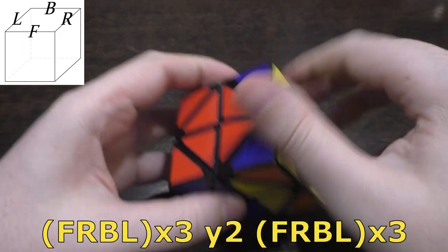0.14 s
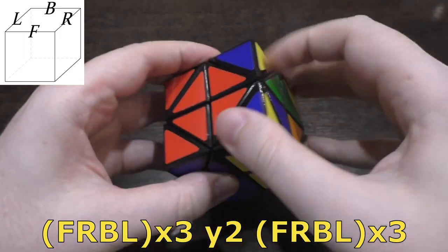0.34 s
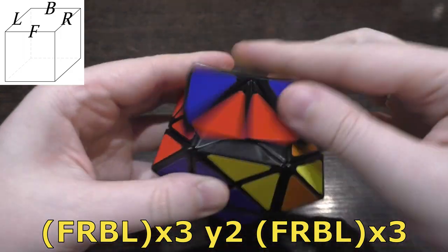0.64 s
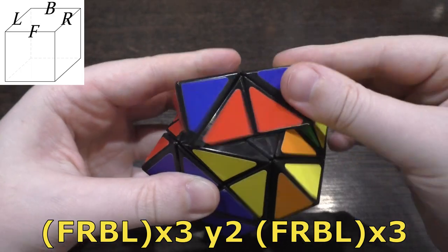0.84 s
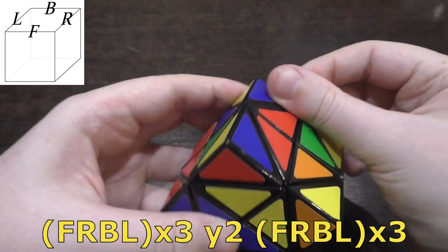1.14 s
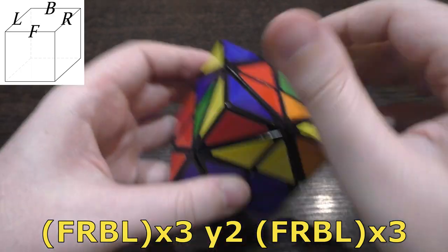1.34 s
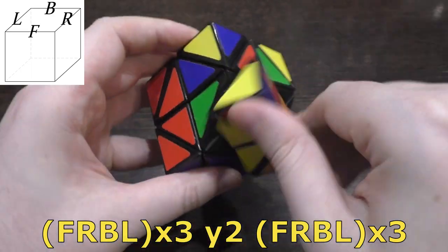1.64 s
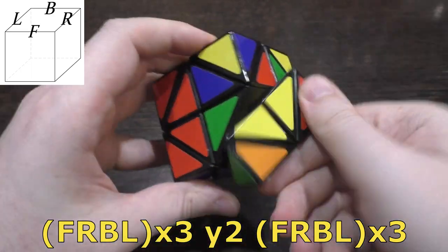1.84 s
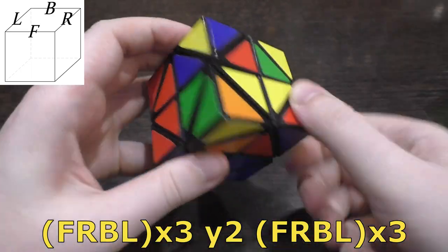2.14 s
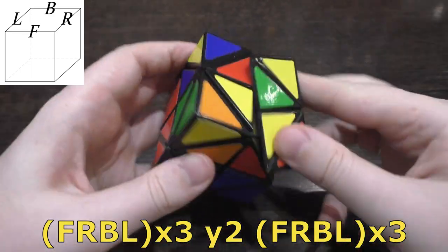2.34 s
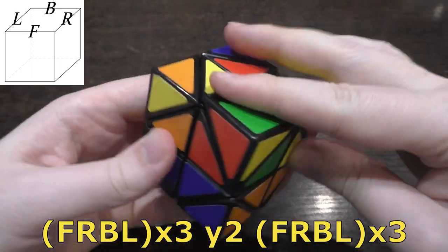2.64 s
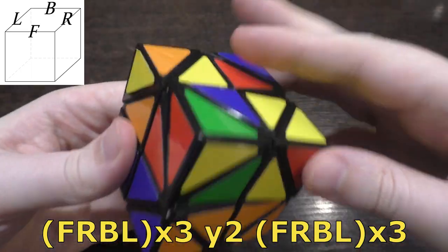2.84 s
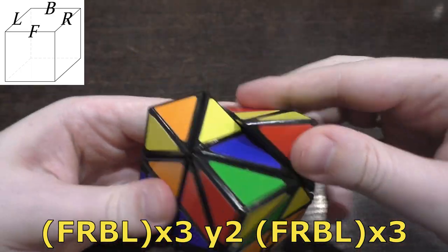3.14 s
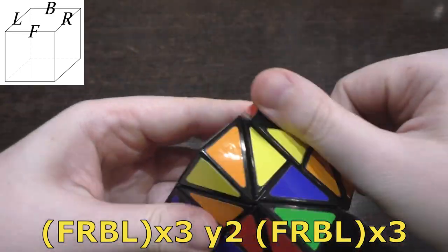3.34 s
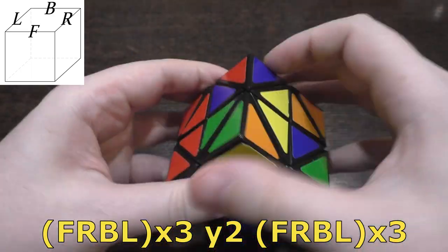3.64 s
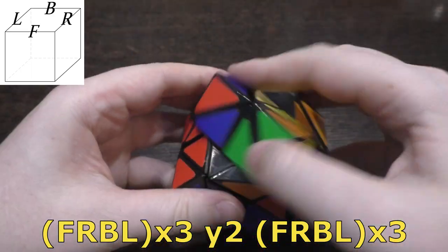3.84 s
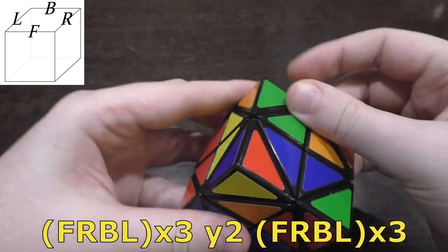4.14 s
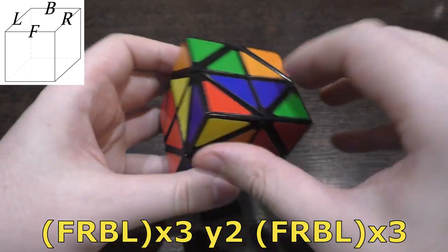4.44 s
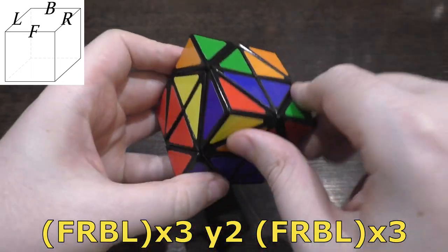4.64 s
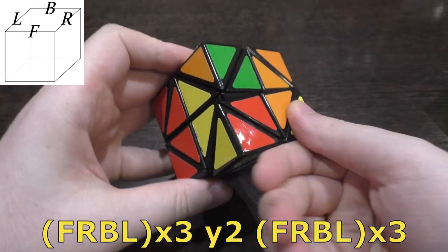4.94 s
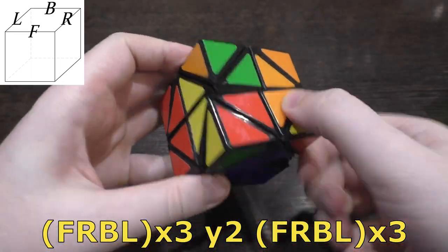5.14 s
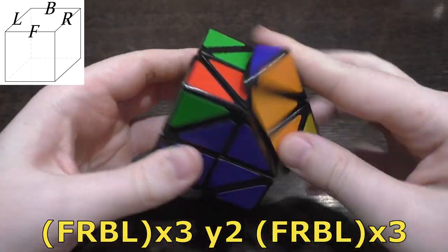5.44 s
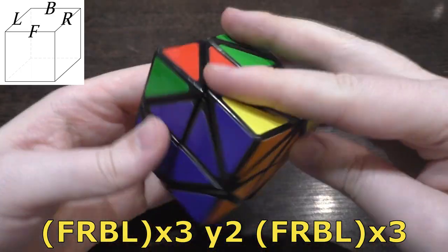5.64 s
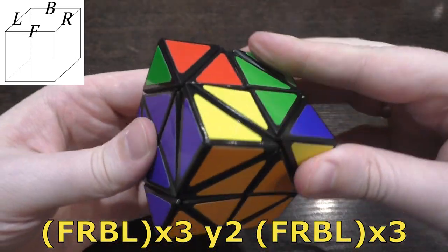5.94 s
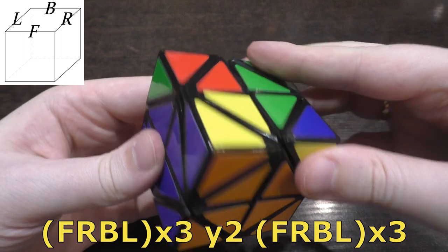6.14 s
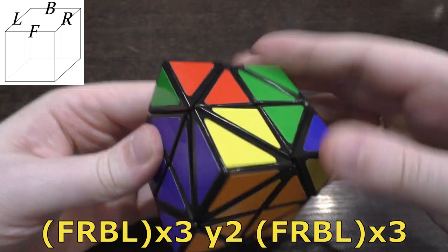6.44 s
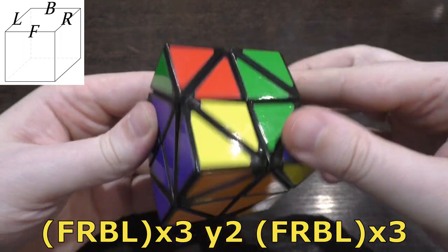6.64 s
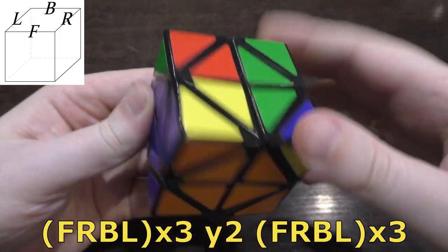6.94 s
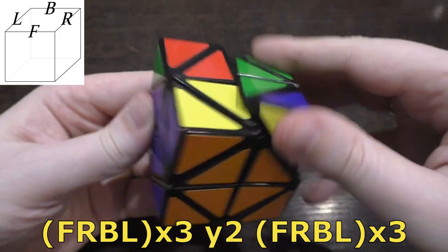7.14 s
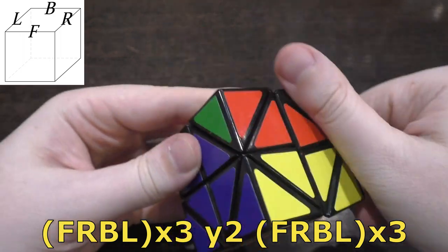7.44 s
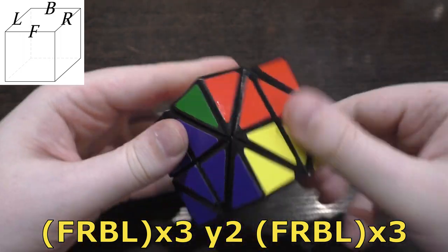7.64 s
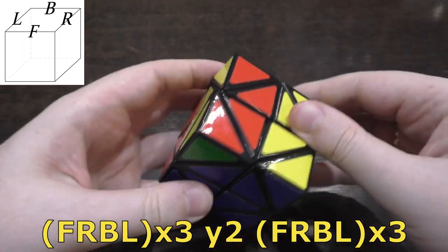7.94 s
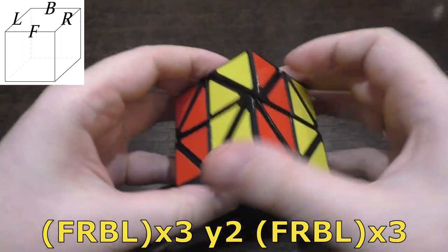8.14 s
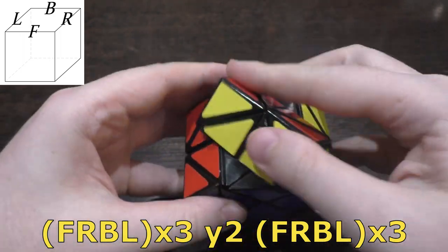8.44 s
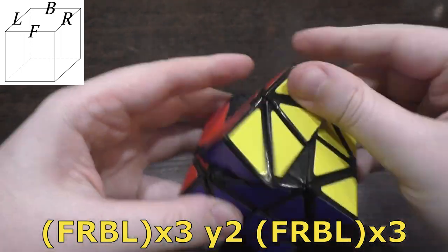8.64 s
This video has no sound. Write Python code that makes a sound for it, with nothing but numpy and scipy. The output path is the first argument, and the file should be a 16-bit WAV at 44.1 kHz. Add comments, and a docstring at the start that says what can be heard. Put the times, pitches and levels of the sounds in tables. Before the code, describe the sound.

A plastic twisty puzzle is turned by two hands close to the microphone in a small room. Dry, hollow clacks come in dense irregular clusters, joined by short gritty scrapes, a faint metallic spring ringing and a few tiny squeaks. Soft hand rustles fill some grip changes. Faint hiss and hum lie beneath, dropping slightly after three seconds. Toward the end the clacks thin out and a last long scrape follows.

```python
"""Twisty puzzle in two hands

Two hands turn the layers of a plastic puzzle in quick runs, close to a microphone in a small room.
Clacks are bursts of tiny contacts coloured by hollow plastic; scraping and settling are showers of ticks.
Springs in the core sing with the turns; short squeaks and pings are dying sines. Grip changes are shaped noise.
Noise also makes the early echoes, the room tail and a faint hiss, which lies under everything with a hum."""
import sys
import numpy as np
from scipy import signal
from scipy.fft import rfft, irfft
from scipy.io import wavfile
from scipy.ndimage import uniform_filter1d

SR = 44100
rng = np.random.default_rng(int(sys.argv[2]) if len(sys.argv) > 2 else 0)


def unload_wav(signal):
    """Save mono or channel-first audio to the path in sys.argv[1] as 16-bit WAV at rate SR, clipped to [-1, 1]."""
    wavfile.write(
        sys.argv[1],
        SR,
        np.round(np.clip(np.atleast_2d(signal).T, -1, 1) * 32767).astype(np.int16),
    )


N = 388080
SIZE = 2048  # samples in one short burst
HZ = np.fft.rfftfreq(SIZE, 1 / SR)
TIME = np.arange(N) / SR

# clacks of the pieces: time_s (near the first touch), level_db (reference for the parts of the clack),
# hardness_db (treble relative to that level)
CLACK_ROWS = [(0.1996, -13, -12.5), (0.395, -22.5, -10.5), (0.4504, -22, -22), (0.5315, -9, -8),
              (0.5515, -15, 0), (0.557, -11, -3.5), (0.5666, -4, -8.5), (0.6597, -21.5, -11),
              (0.6727, -26, -7.5), (0.752, -7, -15.5), (0.793, -15.5, -15), (0.8347, -17.5, -11.5),
              (0.8903, -11.5, -10), (0.9, -15, -8), (0.9546, -19, -8), (1.0705, -13, -13),
              (1.1621, -18, -12.5), (1.1723, -16, -11), (1.1823, -13, -9), (1.3383, -8.5, -8),
              (1.3865, -15.5, -16.5), (1.443, -32.5, 0), (1.6028, -31, -24), (1.6538, -15.5, -15),
              (1.6721, -17.5, -10.5), (1.703, -11, -13.5), (1.7235, -8.5, -11.5), (1.8436, -3.5, -9),
              (1.938, -13.5, -9.5), (2.0392, -13, -12), (2.056, -14.5, -7.5), (2.154, -12.5, -10.5),
              (2.244, -22.5, -13.5), (2.2662, -17, -10.5), (2.3763, -10.5, -4), (2.4171, -12, -7.5),
              (2.4306, -10.5, -1.5), (2.5335, -13.5, -8), (2.6117, -15, -14), (2.6486, -13.5, -24),
              (2.7135, -19.5, -17), (2.7612, -12, -1), (2.9602, -20.5, -24.5), (2.9916, -13.5, -12),
              (3.032, -24.5, -6.5), (3.057, -7.5, -13), (3.0973, -10.5, -3), (3.1675, -5.5, -4.5),
              (3.1834, -21.5, 4.5), (3.4313, -21, -11), (3.5359, -22.5, -14), (3.5914, -26, -21),
              (3.863, -17, -8.5), (3.898, -15.5, -9), (4.0884, -14.5, -6), (4.2116, -12.5, -5.5),
              (4.3485, -15.5, -14.5), (4.4061, -21, -17), (4.4788, -15.5, -13), (4.599, -29, -26),
              (4.6768, -17, -14), (4.695, -17.5, -10.5), (4.7277, -15.5, -13), (4.79, -7.5, -4),
              (4.802, -17, -7.5), (4.9847, -15.5, -18), (5.0292, -20.5, -10), (5.1136, -15.5, -16),
              (5.1584, -16, -8.5), (5.217, -16.5, -10), (5.2965, -26.5, -16), (5.4106, -15.5, -7.5),
              (5.4362, -22, -4.5), (5.4713, -9, -4), (5.5578, -11.5, -9), (5.665, -21, -5),
              (5.7479, -26, -18), (5.7733, -18.5, -17.5), (5.9493, -23, -13.5), (5.9555, -10.5, -9.5),
              (5.998, -10.5, -15), (6.0349, -12.5, -11.5), (6.054, -14, -2), (6.0604, -8.5, -3.5),
              (6.1308, -14.5, -10), (6.1678, -10.5, -13), (6.246, -20, -8), (6.2548, -16.5, -11.5),
              (6.2734, -16, -9.5), (6.3148, -8.5, -9), (6.3305, -19.5, -6.5), (6.4943, -26.5, -12.5),
              (6.69, -13, -20), (6.7218, -9, -8), (6.7606, -13.5, -10.5), (6.7913, -16, -14.5),
              (6.8094, -15.5, -11.5), (6.8566, -12.5, -5), (6.894, -18, -8.5), (6.9728, -22, -4.5),
              (6.99, -7, -8), (7.0335, -14, -5.5), (7.0501, -8, -6), (7.1743, -11.5, -8.5),
              (7.1971, -12.5, -10), (7.231, -14, -14.5), (7.3825, -8.5, -13.5), (7.5507, -20.5, -15),
              (7.714, -32.5, -15), (7.7684, -17, -12), (7.9196, -10, -9.5), (8.0568, -16, -11),
              (8.4052, -9, -8), (8.4499, -16.5, 4.5), (8.5016, -18.5, -6)]


def amp(db):
    """Turns decibels into a gain."""
    return 10 ** (np.asarray(db) / 20)


def evened(x):
    """Scales a sound to an rms (average strength) of 1."""
    return x / np.sqrt(np.mean(x ** 2) + 1e-20)


def read(points, hz):
    """Reads a curve between its points on a log-frequency axis."""
    point_hz, value = np.transpose(points)
    return np.interp(np.log(hz + 1), np.log(point_hz), value)


def add(mix, start_s, sound):
    """Mixes a sound in from the given time."""
    part = mix[max(round(start_s * SR), 0):][:len(sound)]
    part += sound[:len(part)]


def wobble(size, span):
    """Makes a smooth random curve of rms 1 that changes over about span steps."""
    noise = rng.standard_normal(size)
    smoother = signal.windows.hann(2 * int(span) + 1)
    return evened(signal.fftconvolve(noise, smoother, "same"))


def ring(colour_db):
    """Turns a colour into the ringing after one sharp tap: nothing sounds before the tap."""
    both_halves_db = np.r_[colour_db, colour_db[-2:0:-1]]
    log_gain = np.log(amp(both_halves_db))
    return np.fft.ifft(np.exp(np.conj(signal.hilbert(log_gain)))).real


def ripple(fine_db=2, broad_db=2, fine_hz=260, broad_hz=1200):
    """Gives a piece its own random resonances, both fine and broad."""
    fine = fine_db * wobble(len(HZ), fine_hz / HZ[1])
    broad = broad_db * wobble(len(HZ), broad_hz / HZ[1])
    return fine + broad


def piece():
    """Colours one hollow plastic piece: a shared colour plus resonances of its own."""
    # shared colour of the hollow pieces: pitch_hz, level_db
    shell_curve = [(40, -32), (200, -20), (480, -21), (710, -11.5), (870, -16), (1080, 2), (1280, -4.5),
                   (1850, 1), (2700, -7.5), (7000, -15), (9900, -12.5), (15500, -21)]
    return read(shell_curve, HZ) + ripple()


def mode(hz, t60_s, rise_s=0.00087):
    """Vibrates as one sine that falls by 60 dB in t60_s after a very short rise."""
    t = TIME[:SR]
    fall = np.exp(-np.log(1000) * t / t60_s)
    return np.sin(2 * np.pi * hz * t) * fall * np.minimum(t / rise_s, 1)


def clack(time_s, level_db, hardness_db, contacts_per_s=9000, trail=1.0, firmness=1.56, lead=.55, swell=1.41):
    """Lets loose pieces touch, hit home and rattle out within a few milliseconds."""
    # a dull tap chatters a little, a loose piece most, and a hard snap is over at once:
    # hardness_db, chatter_ms
    chatter_curve = [(-13.5, 2.1), (-8.5, 3), (-1.5, 1.25)]
    # limits of the knock, body and treble bands: edge_hz
    band_edges = [400, 1300, 4500, 16000]
    # a harder blow also knocks the core more; both levels are relative to the clack's level
    body_db, knock_db, knock_db_per_hard_db = -5, -9, 0.47

    chatter_ms = max(np.interp(hardness_db, *np.transpose(chatter_curve)), .5)
    home = SIZE // 8  # sample where the main blow lands
    ms = (np.arange(SIZE) - home) * 1000 / SR
    contacts = rng.standard_normal(SIZE) * (rng.random(SIZE) < contacts_per_s / SR)
    # the contacts swell from the first touch, then die away after the blow
    contacts *= np.exp(-abs(ms) / trail / chatter_ms)
    contacts *= np.clip(2 * ms / (swell * chatter_ms) + 2, 0, 1)

    # a short clack is mostly one clean blow, a long one mostly chatter
    blow_share = .7 / max(chatter_ms, 1) ** abs(firmness)
    force = np.sqrt((1 - blow_share) / SIZE) * evened(contacts)
    force[home] += np.sqrt(blow_share)

    # the blow sets the strength of knock, body and treble, each as rms over 2 ms
    colour_db = piece()
    wanted_db = level_db + np.array([knock_db + knock_db_per_hard_db * hardness_db, body_db, hardness_db])
    for _ in range(3):  # each pass brings the bands nearer to the wanted strengths
        power = abs(rfft(force) * amp(colour_db)) ** 2 * 2 / SIZE / (SR / 500)
        band_power = np.histogram(HZ, band_edges, weights=power)[0]
        tilt_db = wanted_db - 10 * np.log10(band_power)
        tilt_points = list(zip([500, 1100, 1700, 7000], [tilt_db[:2].mean(), *tilt_db]))
        colour_db = colour_db + read(tilt_points, HZ)
    start_s = time_s + lead * chatter_ms / 1000 - home / SR  # the blow lands just after time_s
    return start_s, signal.fftconvolve(force, ring(colour_db))


def clacks():
    """Adds up all the clacks of pieces hitting home."""
    out = np.zeros(N)
    for row in CLACK_ROWS:
        add(out, *clack(*row))
    return out


def rub(size, catches_per_s=1200, size_db=3.5, snags_per_s=28, snag_s=0.0025, snag_size=8,
        shift_db=3, shift_s=0.032, count=4):
    """Makes sliding faces catch in tiny ticks, heavier after each snag; load shifts from piece to piece."""
    # how rubbing differs from the colour of a piece: pitch_hz, change_db
    rub_curve = [(700, 2), (1100, -1), (3500, 1), (9000, 0.5), (14000, -1.5)]
    out = np.zeros(size)
    for _ in range(count):  # one round for each rubbing piece
        snags = (rng.random(size) < snags_per_s / SR) * 1.0
        load = 1 + snag_size * signal.lfilter([1], [1, -np.exp(-1 / (snag_s * SR))], snags)
        ticks = rng.choice([-1, 1], size) * (rng.random(size) < catches_per_s / SR)
        uneven_db = size_db * rng.standard_normal(size) + shift_db * wobble(size, shift_s * SR)
        ticks = ticks * load * amp(uneven_db)
        out += signal.oaconvolve(ticks, ring(piece() + read(rub_curve, HZ)))[:size]
    return evened(out)


def settling(start_db=-23.5, fall_db_per_s=-220):
    """Lets each piece that has hit home rub on for a moment, quickly fading."""
    out = np.zeros(N)
    t = TIME[:SR // 8]
    for time_s, level_db, _ in CLACK_ROWS:
        grain = rub(len(t), catches_per_s=2500, size_db=3.5, snag_size=1.1, count=1)
        add(out, time_s, amp(level_db + start_db + fall_db_per_s * t) * grain)
    return out


def spring(shake, t60_s=0.22, level_db=-54):
    """Makes the spring of the turning axle sing along with the sliding; each has its own tension."""
    # ways a spring vibrates, before its own random changes: pitch_hz, level_db
    spring_modes = [(1760, -1), (1940, 5.5), (3400, 3), (5250, -2), (6550, 6)]
    # random change of each mode: share of its pitch, and dB
    changes = rng.standard_normal((len(spring_modes), 2)) * [.015, 2.5]
    modes = np.zeros(SR)
    for (hz, db), (detune, off_db) in zip(spring_modes, changes):
        modes += amp(db + off_db) * mode(hz * (1 + detune), t60_s)
    return amp(level_db) * signal.fftconvolve(shake, modes)


def scraping(attack_s=0.0098, release_s=0.0377):
    """Rubs the faces together in each turn, which gets going, holds and runs out, and stirs a spring."""
    # turns of a layer: start_s, end_s (where the fade begins), level_db, sing_db (how freely its spring sings)
    slide_rows = [(0, 0.057, -31.5, -1), (0.638, 0.77, -30.5, 0), (0.941, 1.055, -30.5, 6),
                  (1.691, 1.865, -33, 0), (1.948, 2.037, -33, 8), (2.487, 2.634, -29.5, 0),
                  (3.072, 3.16, -32.5, -2), (3.27, 3.527, -34.5, 0), (3.86, 4.028, -35.5, 2),
                  (4.05, 4.215, -31, 4), (4.672, 4.724, -41.5, -6), (4.788, 4.976, -33, 0),
                  (5.412, 5.657, -31.5, 4), (6.699, 6.903, -39, -14), (7.23, 7.483, -29.5, 2),
                  (8.402, 8.795, -33, -0.5)]
    out = np.zeros(N)
    for start_s, end_s, level_db, sing_db in slide_rows:
        t = TIME[:round((end_s - start_s + release_s) * SR)]
        fade_in = np.minimum(t / attack_s, 1)
        fade_out = np.minimum((t[-1] - t) / release_s, 1)
        slide = amp(level_db) * fade_in * fade_out * rub(len(t))
        add(out, start_s, slide)
        add(out, start_s, amp(sing_db) * spring(slide))
    return out


def squeaks_and_pings():
    """Plays short squeaks and pings as dying sines."""
    # squeaks and pings: time_s, pitch_hz, level_db, t60_s (time to fall by 60 dB)
    tone_rows = [(.712, 2170, -13.5, 0.056), (.795, 3430, -25, 0.1), (2.645, 7200, -37.5, 0.19),
                 (2.644, 4845, -41, 0.21), (3.129, 1935, -13.5, 0.098), (4.214, 1933, -31, 0.41),
                 (5.625, 1790, -35, 0.32), (5.665, 4060, -41, 0.29), (7.088, 2390, -23.5, 0.068),
                 (8.573, 1704, -29, 0.24)]
    out = np.zeros(N)
    for time_s, hz, level_db, t60_s in tone_rows:
        add(out, time_s, amp(level_db) * mode(hz, t60_s))
    return out


def hands():
    """Swells and fades a soft rumble and rustle of skin, as shaped noise, with each change of grip."""
    # changes of grip: middle_s, length_s, level_db (at the height of the swell)
    grip_rows = [(1.297, 0.37, -47.5), (2.2, .25, -52), (2.83, .3, -54.5), (3.098, .22, -44.5),
                 (8.15, 0.87, -48.5)]
    # dull rumble and faint rustle of the hands: pitch_hz, level_db
    hand_curve = [(30, -12), (80, -7), (140, 6), (240, 9.5), (340, -1), (520, -25), (750, -18), (1000, -4),
                  (1400, 1), (2200, -5), (3500, -25), (9000, -47)]
    level = np.zeros(N)
    for middle_s, length_s, level_db in grip_rows:
        add(level, middle_s - length_s / 2, amp(level_db) * np.hanning(round(length_s * SR)))
    colour = amp(read(hand_curve, np.fft.rfftfreq(N, 1 / SR)))
    noise = irfft(rfft(rng.standard_normal(N)) * colour, N)
    return level * evened(noise)


def scatter(x, level_db=-13, centre_hz=3400, octaves=1.04):
    """Scatters the upper mids off the hands, so they reach the two microphone ports out of step."""
    hz = np.fft.rfftfreq(N, 1 / SR) + 1
    upper_mids = np.exp(-.5 * (np.log2(hz / centre_hz) / octaves) ** 2)
    side = amp(level_db) * irfft(1j * rfft(x) * upper_mids, N)  # 1j shifts by a quarter cycle
    return np.array([side, -side])


def echoes(x, level_db=-17, delay_s=0.0084, width_s=0.0018, apart=0.13):
    """Throws back a cluster of early echoes from near surfaces."""
    common, side = rng.standard_normal((2, SIZE))
    taps = np.array([common + apart * side, common - apart * side])
    taps = taps * np.exp(-abs(TIME[:SIZE] - delay_s) / width_s)
    taps = evened(taps) / np.sqrt(SIZE)
    return amp(level_db) * signal.oaconvolve(x[None], taps, axes=1)[:, :N]


def room(x, level_db=-15, apart=0.36):
    """Stores the sound energy band by band and lets it out as a diffuse tail of noise."""
    # how long the room rings: pitch_hz, t60_s (time to fall by 60 dB)
    room_curve = [(400, 0.85), (2000, 0.32), (12000, 0.078)]
    hz, frame_s, frames = signal.stft(x, SR)
    energy = uniform_filter1d(abs(frames) ** 2, size=3, axis=0)
    energy = np.pad(energy, ((0, 0), (2, 0)))[:, :-2]  # the tail starts two frames late
    keep = np.exp(-2 * np.log(1000) * frame_s[1] / read(room_curve, hz))
    stored = np.array([signal.lfilter([1 - kept], [1, -kept], band) for kept, band in zip(keep, energy)])
    common, side = signal.stft(rng.standard_normal((2, N)), SR)[2]
    noise = np.array([common + apart * side, common - apart * side])
    tail = signal.istft(noise * np.sqrt(abs(stored)), SR)[1]
    return amp(level_db) * np.std(x) * evened(tail[:, :N])


def background(air_db=-47.5, waver_db=-0.43, dip_s=3.19, dip_db=-5.5, recover_db_per_s=1.0):
    """Mixes shaped noise for rumble and hiss with sines for mains hum; drops once and creeps back."""
    # colour of the rumble and hiss: pitch_hz, level_db (per Hz, relative)
    air_curve = [(40, -18), (90, -6), (140, -2), (260, 0), (360, -5), (520, -13), (1050, -10), (1900, -10),
                 (3000, -17), (4500, -24), (7500, -29), (10500, -24), (15000, -26)]
    # how alike left and right are: pitch_hz, likeness (0-1)
    alike_curve = [(60, 0.37), (1500, 0.68)]
    # mains hum before the drop: pitch_hz, level_db (rms)
    hum_rows = [(150, -51.5), (199.3, -58)]
    hz = np.fft.rfftfreq(N, 1 / SR)
    left, other = rfft(rng.standard_normal((2, N)))
    alike = np.clip(read(alike_curve, hz), 0, 1)
    right = alike * left + np.sqrt(1 - alike ** 2) * other
    air = irfft(np.array([left, right]) * amp(read(air_curve, hz)), N)
    air = amp(air_db) * evened(air) * amp(waver_db * wobble(N, SR / 10))
    hum = np.zeros(N)
    for hum_hz, level_db in hum_rows:
        hum += np.sqrt(2) * amp(level_db) * np.sin(2 * np.pi * (hum_hz * TIME + rng.random()))
    drop_db = np.minimum(dip_db + recover_db_per_s * (TIME - dip_s), 0)
    return (air + hum) * amp((TIME > dip_s) * drop_db)


def scene():
    """Puts the puzzle almost straight ahead, with its echoes, the hands and the background."""
    puzzle = clacks() + settling() + scraping() + squeaks_and_pings()
    direct = puzzle * amp([[.25], [-.25]])  # left and right, dB
    return direct + scatter(puzzle) + echoes(puzzle) + room(puzzle) + hands() + background()


def record(dry):
    """Clips the sharpest peaks, then takes away everything above the top of the band."""
    low_pass = signal.firwin(511, 16000, window=("kaiser", 9), fs=SR)  # band ends at 16000 Hz
    return signal.oaconvolve(np.clip(dry, -1, 1), low_pass[None], "same")


dry = scene()
out = record(dry)
unload_wav(out)
```